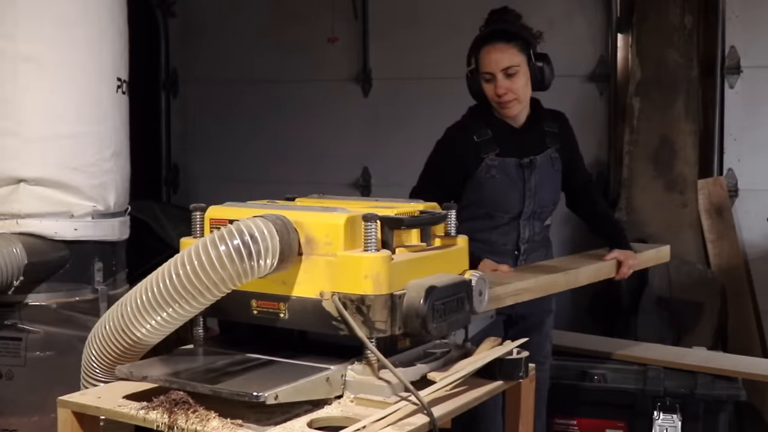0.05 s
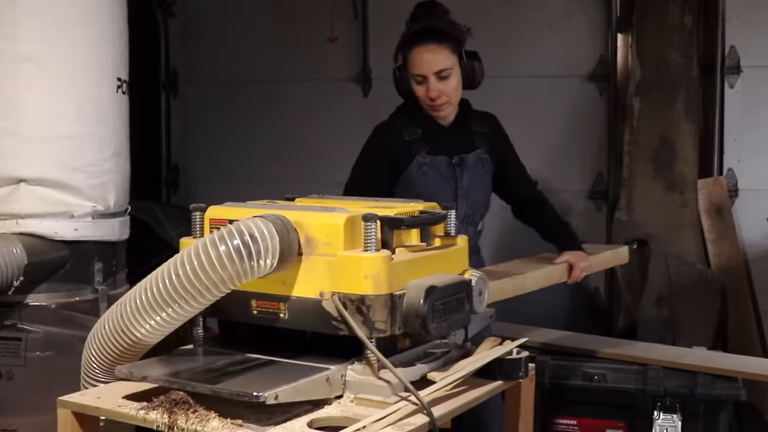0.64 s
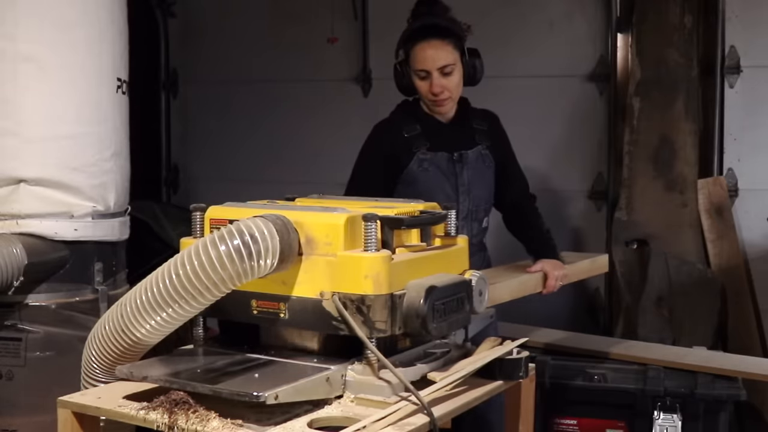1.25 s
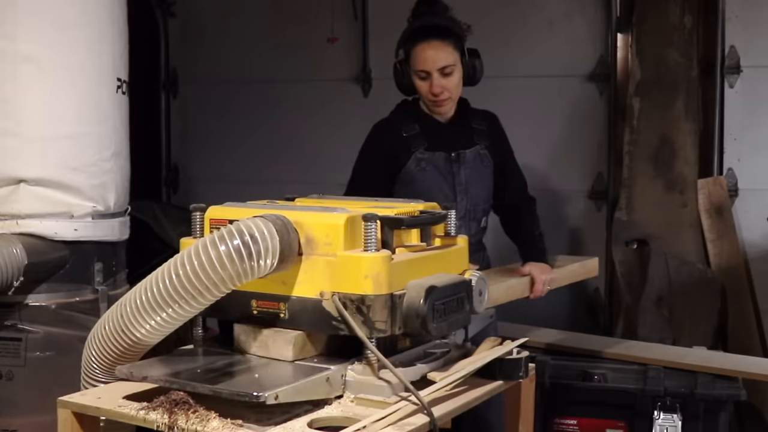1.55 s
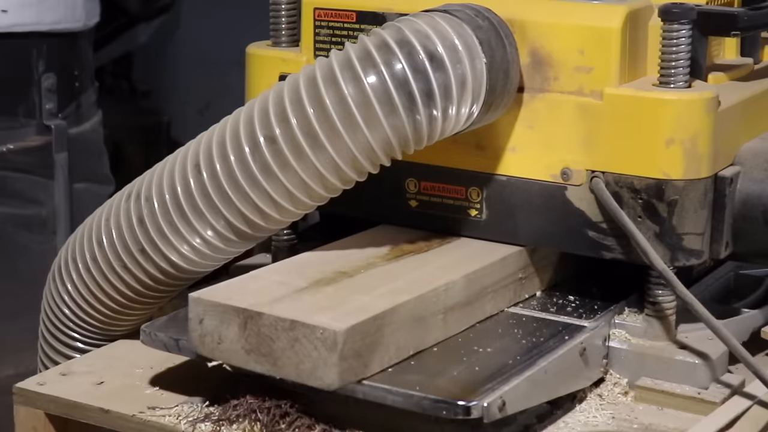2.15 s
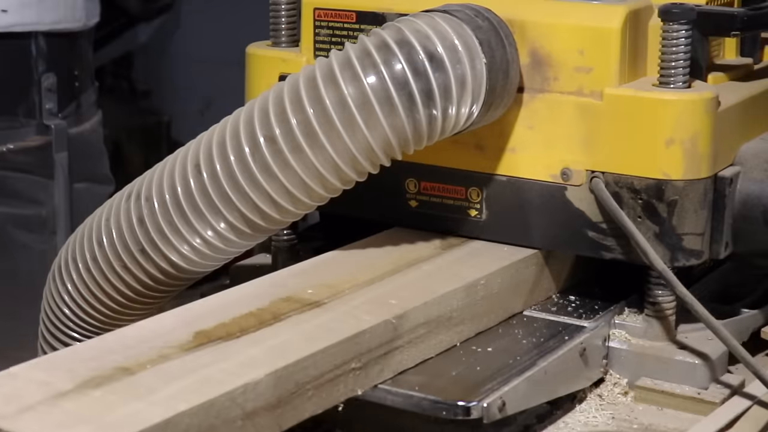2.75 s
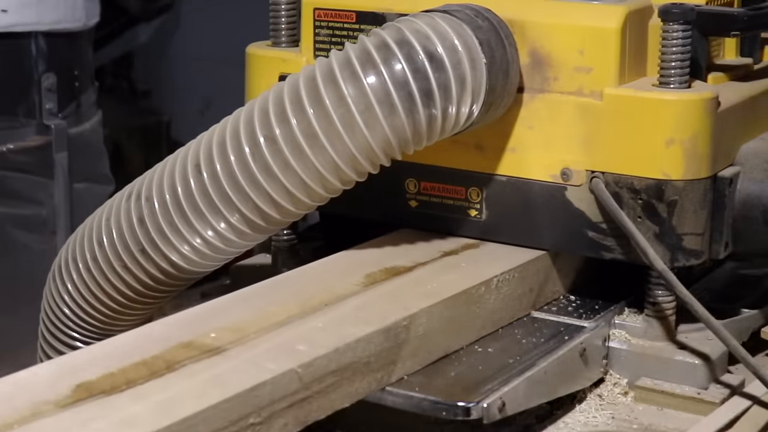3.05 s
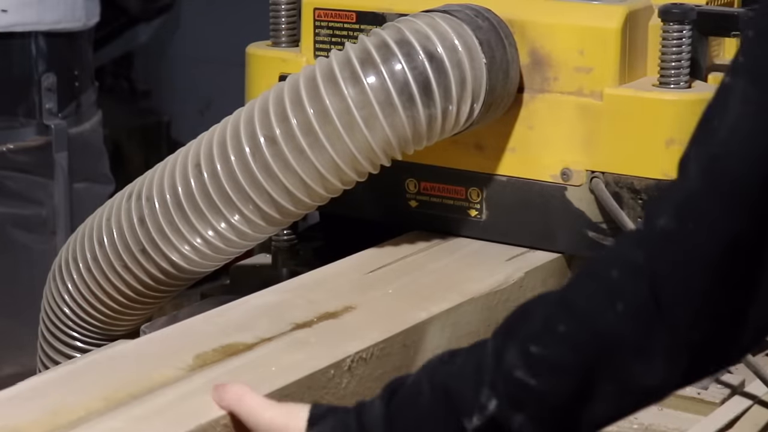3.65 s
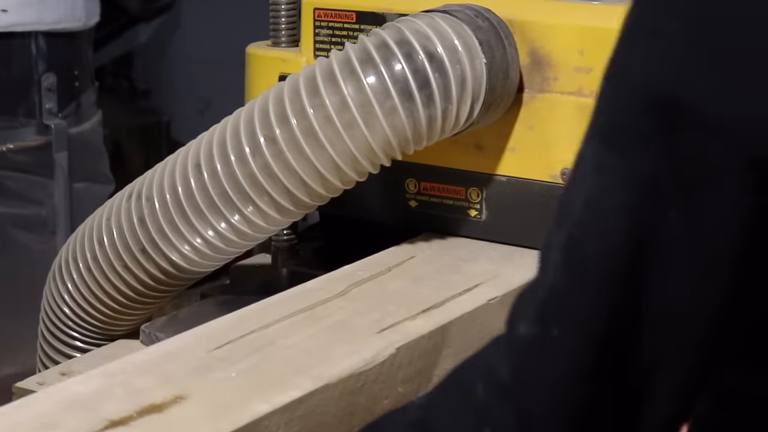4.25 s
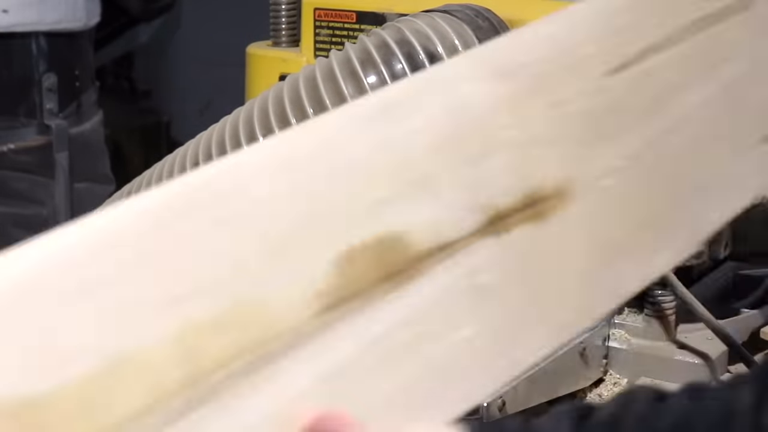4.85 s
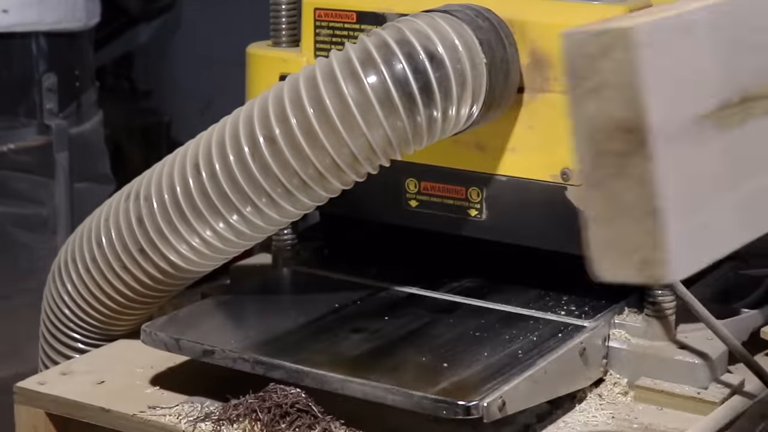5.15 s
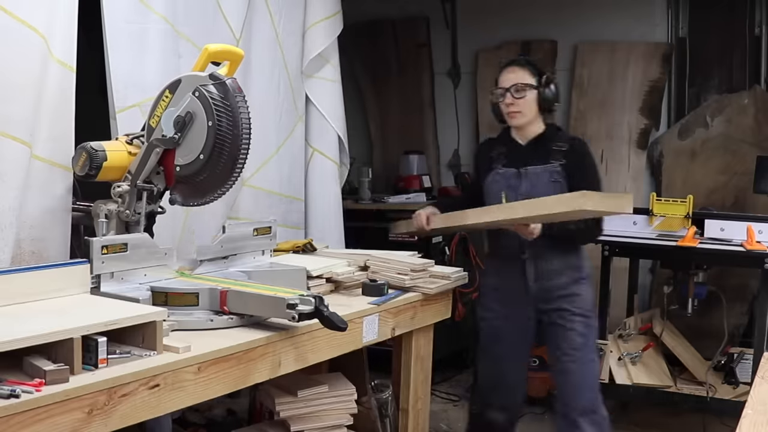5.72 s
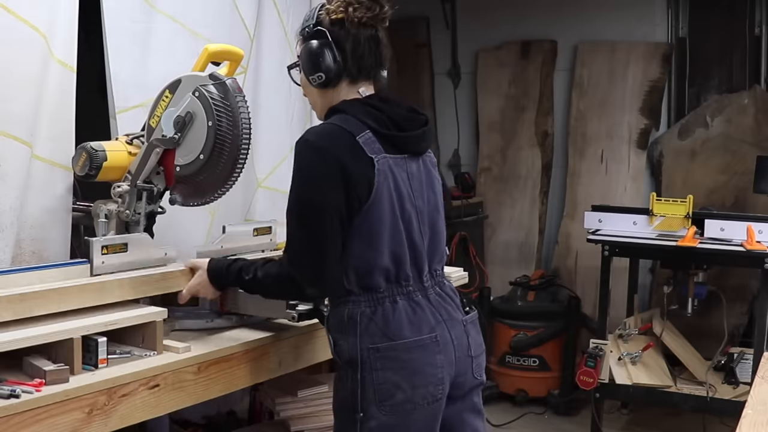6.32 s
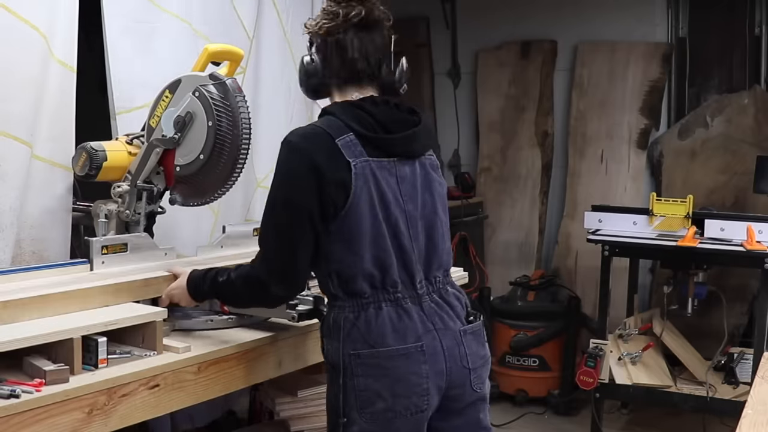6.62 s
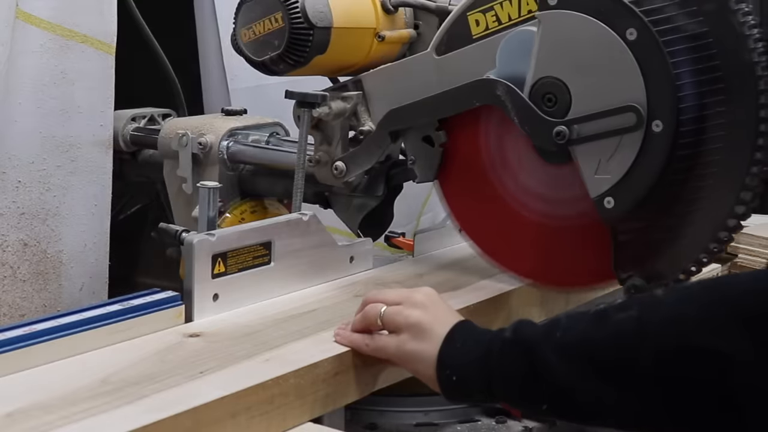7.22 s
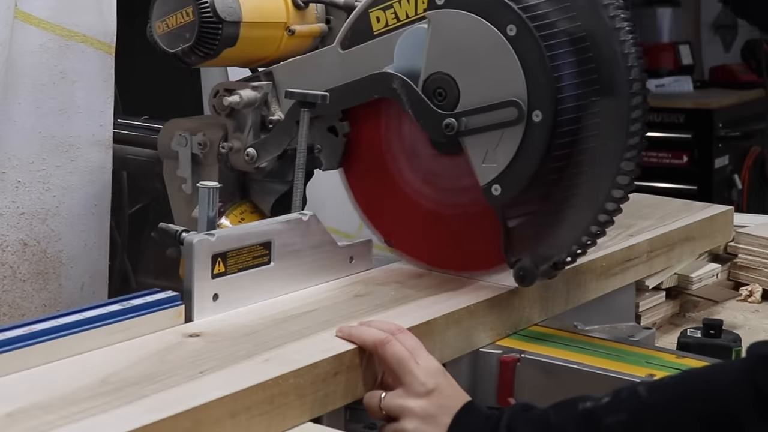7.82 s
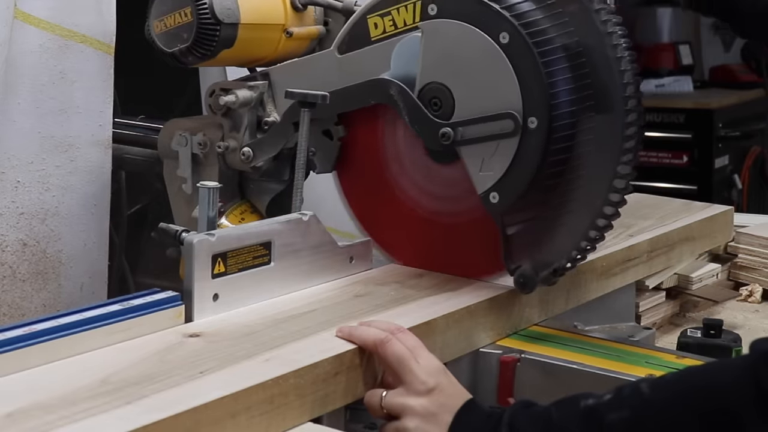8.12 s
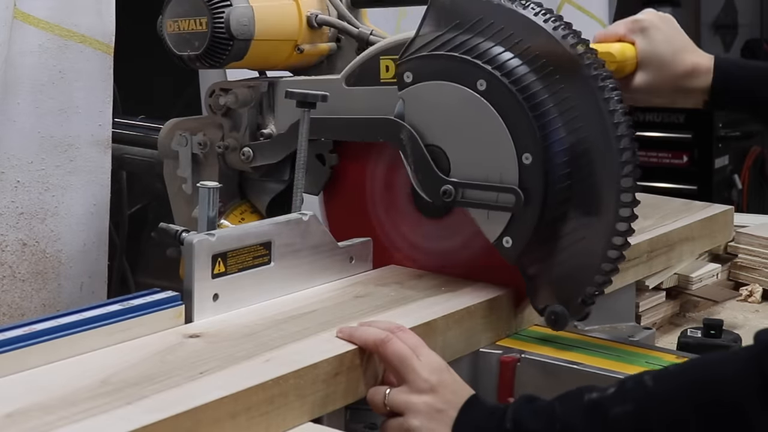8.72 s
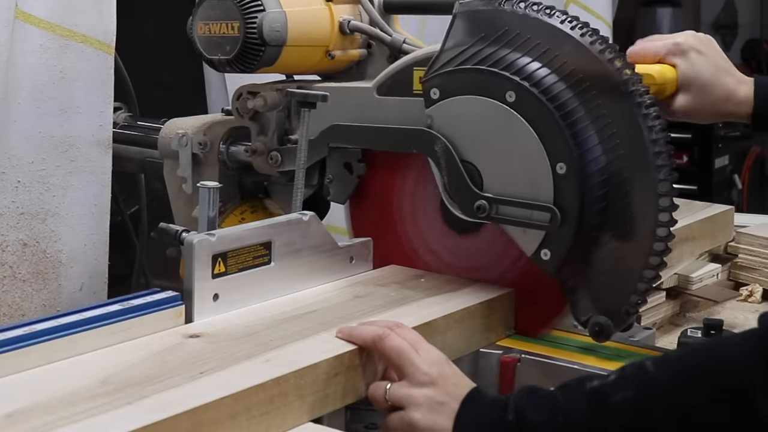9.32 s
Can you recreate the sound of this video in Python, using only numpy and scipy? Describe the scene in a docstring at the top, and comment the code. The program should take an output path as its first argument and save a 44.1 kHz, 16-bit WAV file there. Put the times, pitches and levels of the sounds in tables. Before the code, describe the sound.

In a workshop, a loud planer sags under a cut and recovers, followed by wooden knocks and a miter saw spinning up and slicing wood.

```python
"""Planer, board and miter saw

A thickness planer, first from afar and then close, sags under a board and recovers as it clears:
its three knives hammer the wood and chop the air into a siren tone, over gear tones and rushing air.
The board is set down on a bench with a few ringing knocks and a slide. Then a miter saw clicks on,
whines up to speed and cuts through it, its teeth squealing and its blade plate ringing."""
import sys
import numpy as np
from scipy import signal
from scipy.fft import rfft, irfft
from scipy.io import wavfile
from scipy.ndimage import uniform_filter1d

SR = 44100
rng = np.random.default_rng(int(sys.argv[2]) if len(sys.argv) > 2 else 0)


def store_pcm(level_fs):
    """Save levels as 16-bit WAV."""
    pcm = np.round(np.clip(level_fs, -1, 1) * 32767).astype(np.int16)
    wavfile.write(sys.argv[1], SR, np.atleast_2d(pcm).T)


N = 417627
TIME = np.arange(N) / SR
FREQ = np.fft.rfftfreq(N, 1 / SR)
TOP_HZ = 15900


def amp(db):
    """Decibels to gain."""
    return 10 ** (np.asarray(db) / 20)

def unit(x):
    """Scales to rms 1."""
    return x / np.sqrt(np.mean(x ** 2) + 1e-20)

def automation(points):
    """A breakpoint curve at every sample."""
    return np.interp(TIME, *np.transpose(points))

def read(points, hz):
    """Reads a spectrum table on a log-frequency axis."""
    f, value = np.transpose(points)
    return np.interp(np.log(hz + 1), np.log(f), value)

def swell(s, half_length):
    """A bell envelope, 1 at time s."""
    return np.exp(-((TIME - s) / half_length) ** 2)

def gate(start, end):
    """Open from start to end, with 3 ms fades."""
    return np.clip(np.minimum(TIME - start, end - TIME) / .003 + .5, 0, 1)

def add(mix, s, sound):
    """Mixes a sound in at time s."""
    part = mix[round(s * SR):][:len(sound)]
    part += sound[:len(part)]

def noise(gain):
    """Noise of rms 1, shaped by a gain at each frequency."""
    return unit(irfft(rfft(rng.standard_normal(N)) * gain, N))

def wander(hz):
    """Smooth random modulation of rms 1."""
    return noise(1 / (1 + (FREQ / hz) ** 4))

def drift(hz):
    """Ramps between random values, hz of them a second."""
    knots = np.arange(0, TIME[-1] + 1, 1 / hz)
    return np.interp(TIME, knots, np.clip(rng.standard_normal(1000), -2, 2)[:len(knots)])

def ring(hz, half_width):
    """A resonance fed by noise."""
    return noise(np.minimum(FREQ / hz, 1) ** 2 / (1 + ((FREQ - hz) / half_width) ** 2))

def tone(turns, flutter, flutter_hz):
    """A partial of rms 1 whose level and phase flutter in turbulent air."""
    phase = 2 * np.pi * (turns + rng.random())
    knots = np.arange(0, TIME[-1] + 1, 1 / 400)
    pole = np.exp(-2 * np.pi * flutter_hz / 400)
    smooth = signal.lfilter([1], [1, -pole], rng.standard_normal((2, len(knots))))
    a, b = (flutter * np.interp(TIME, knots, unit(v)) for v in smooth)
    return ((1 + a) * np.cos(phase) + b * np.sin(phase)) * np.sqrt(2 / (1 + 2 * flutter ** 2))

def standing_waves(hz, depth_db, spacing_hz):
    """Gain that swells and thins a partial as its pitch moves."""
    grid = np.arange(0, SR, spacing_hz)
    heights = np.clip(rng.standard_normal(2000), -1.6, 1.6)[:len(grid)]
    return amp(depth_db * np.interp(hz, grid, heights))

def turbulence(x, depth_db, bins, frames):
    """Lifts and thins random patches of a noise's spectrogram."""
    z = signal.stft(x, SR, nperseg=512)[2]
    field = uniform_filter1d(rng.standard_normal(z.shape), bins, axis=0)
    field = uniform_filter1d(field, frames, axis=1)
    return signal.istft(z * amp(depth_db * unit(field)), SR, nperseg=512)[1][:N]

def rush(free, cut, load, roar_db, hiss_db):
    """Air noise as low roar and high hiss; load crossfades from the free EQ to the cutting EQ."""
    low = 1 / np.sqrt(1 + (FREQ / 3800) ** 16)
    out = np.zeros(N)
    for eq, share in ((free, 1 - load), (cut, load)):
        gain = amp(read(eq, FREQ)) * (FREQ / np.hypot(FREQ, 60)) ** 2
        roar = amp(roar_db) * noise(gain * low)
        hiss = amp(hiss_db) * noise(gain * np.sqrt(1 - low ** 2))
        out += np.sqrt(share) * (roar + hiss)
    return out


# Room tone EQ: f/Hz, level/dB
SHOP_EQ = [(18, -61), (30, -38), (220, -3.5), (435, -7.5), (496, -4.5), (645, -5), (1090, -2.5),
           (1420, -6.5), (1530, -10), (1790, -0.5), (1940, -8), (15800, -36)]

def room_tone():
    """The quiet noise bed of the shop."""
    return amp(-60.5) * noise(amp(read(SHOP_EQ, FREQ)))

def hum(hz, db):
    """A hum of steady pitch."""
    return amp(db) * tone(hz * TIME, 0.44, 1.9)

# Reverb decay: f/Hz, t60/s
SHOP_DECAY = [(100, 0.19), (500, 0.18), (2000, 0.18), (6000, 0.13), (15000, 0.16)]

def reverb(x):
    """Dense reflections of the shop, the treble dying first."""
    t = np.arange(SR // 2) / SR
    taps = rng.standard_normal(len(t)) * (rng.random(len(t)) < .08) * (t > .003)
    hz, when, z = signal.stft(taps, SR, nperseg=256)
    tail = signal.istft(z * amp(-60 * when / read(SHOP_DECAY, hz)[:, None]), SR, nperseg=256)[1]
    return signal.oaconvolve(x, tail / np.linalg.norm(tail))[:N]


# Sharp ticks: t/s, level/dB
TICKS = [(6.698, -54), (6.737, -53), (6.851, -42), (6.896, -39.5)]

def ticks():
    """Tiny bursts of bright noise."""
    out, t = np.zeros(N), np.arange(SR // 3) / SR
    bright = noise(FREQ / np.hypot(FREQ, 9000))
    for s, db in TICKS:
        add(out, s, amp(db) * bright[round(s * SR):][:len(t)] * np.exp(-t / 0.0013))
    return out

# Friction EQ: f/Hz, level/dB
RASP_EQ = [(100, -28), (500, -22.5), (1200, 1), (2400, 2.5), (4000, -4), (6000, -8), (8500, -10),
           (15500, -20.5)]
# Slide cues: t/s, length/s, level/dB
SLIDES = [(5.525, 0.67, -74.5), (5.63, 0.047, -52.5), (5.914, 0.021, -56.5), (6.199, .08, -53),
          (6.278, .022, -43.5), (6.404, 0.061, -33)]

def slides():
    """The board rasps across the bench."""
    rasp = noise(amp(read(RASP_EQ, FREQ))) * amp(1.5 * wander(250))
    envelope = [0, .35, .75, 1], [0.00039, 0.67, 0.73, 0.00038]
    return rasp * sum(amp(db) * np.interp((TIME - s) / length, *envelope) for s, length, db in SLIDES)

# Modes of the board on the bench: f/Hz, level/dB, t60/s
BOARD_MODES = [(438, -4.5, 0.077), (510, -0.5, 0.079), (553, 1.5, 0.069), (722, 2, 0.072), (983, 1, 0.07),
               (1144, -2, .08), (1373, 2.5, 0.048), (1498, -1.5, 0.1), (1830, -10.5, 0.19),
               (2026, -2, 0.051), (2400, -3, .06), (2480, -16.5, 0.22), (2650, -12, .07), (3500, -18, .06),
               (3950, -28.5, 0.081)]
# EQ of a knock's crack: f/Hz, level/dB
CRACK_EQ = [(60, -22), (200, -14.5), (450, -10.5), (2200, 9), (3500, 0), (6000, -8.5), (10000, -16.5),
            (15500, -28)]
# The board knocks; in the last row the saw's switch clicks on:
# t/s, blow level/dB, blow f/Hz, relative ring level/dB, crack level/dB
KNOCKS = [(4.798, -42, 3500, -74, -45), (5.738, -52, 1190, -50, -60.5), (6.021, -42, 1090, -41, -50),
          (6.029, -35, 2600, -47.5, -29), (6.033, -28.5, 1090, -55.5, -28),
          (6.0454, -21.5, 2650, -37, -26.5), (6.1308, -19.5, 1300, -19.5, -26),
          (6.190, -22, 1213, -21.5, -30), (6.2968, -4.5, 1900, -7.5, -15), (6.3257, -18, 3830, -17, -29.5),
          (6.329, -20, 1340, -49, -33), (6.339, -27, 1590, -31.5, -49), (6.455, -30, 1160, -25.5, -35),
          (6.5755, -30, 1280, -30, -37.5), (6.611, -35, 600, -30, -48), (6.734, -43, 1616, -47, -56),
          (6.963, -40, 2230, -65, -50.5)]
CONTACT_CYCLES = 1.6  # a blow peaks after this many cycles of its pitch: the higher, the shorter

def knocks():
    """Board knocks and the switch click: each a short blow, a crack and a ring."""
    out, t = np.zeros(N), np.arange(SR // 3) / SR
    grit = noise(amp(read(CRACK_EQ, FREQ)))
    for s, blow_db, hz, ring_db, crack_db in KNOCKS:
        contact = CONTACT_CYCLES / hz
        blow = t / contact * np.exp(1 - t / contact) * np.sin(2 * np.pi * hz * t)
        # each place of contact weights and detunes the modes differently
        modes = sum(amp(db + rng.standard_normal() - 60 * t / t60)
                    * np.sin(2 * np.pi * (f * rng.uniform(0.95, 1.02) * t + rng.random()))
                    for f, db, t60 in BOARD_MODES)
        body = modes * (1 - np.exp(-t / 0.00091))
        crack = grit[round(s * SR):][:len(t)] * (np.exp(-t / 0.0039) + 0.18 * np.exp(-t / 0.018))
        add(out, s, amp(blow_db) * blow + amp(ring_db - 11) * body + amp(crack_db) * crack)
    return out

def handling():
    """The board is set down, then the saw's switch clicks on."""
    low_cut = signal.butter(2, 170, "high", fs=SR, output="sos")  # a narrow board radiates little bass
    direct = signal.sosfilt(low_cut, knocks() + slides() + ticks())
    return direct + amp(-13) * reverb(direct)


def glide(stages):
    """From rest, a pitch eases towards each stage's target in turn."""
    hz = np.ones(N)
    for s, target_hz, lag in stages:
        at = round(s * SR)
        hz[at:] = target_hz + (hz[at] - target_hz) * np.exp(-TIME[:N - at] / lag)
    return hz

# Motor partials: pitch ratio, relative level/dB
WHINE_PARTIALS = [(.177, -90.5), (.307, -85), (1, -64), (2, -64.5), (3.39, -61.5), (7.08, -58.5),
                  (7.59, -53.5), (13.6, -64), (14.7, -49)]
FULL_SPEED_HZ = 1300

def whine(hz):
    """The saw motor: thin, rough partials that glide together and grow with its speed."""
    level_db = 1 + 22.5 * np.log10(hz / FULL_SPEED_HZ)
    turns = np.cumsum(hz * (1 + 0.0032 * wander(72))) / SR
    return amp(level_db) * sum(amp(db) * standing_waves(k * hz, 2.6, 309) * tone(k * turns, 0.56, 15)
                               for k, db in WHINE_PARTIALS)

# Blade air EQ, running free and cutting: f/Hz, level/dB
SAW_FREE_EQ = [(47, -84), (80, -54), (212, -41), (491, -24.5), (536, -20), (640, -21), (1040, -16),
               (1390, -16), (1580, -12.5), (2470, -4.5), (4190, -8.5), (4680, -6.5), (7960, 3), (9090, 1.5),
               (15800, 3.5)]
SAW_CUT_EQ = [(47, -84), (80, -41), (491, -28.5), (536, -1), (654, -30), (1190, -8.5), (1270, -24),
              (1730, -13.5), (3080, 1.5), (3920, -14.5), (5000, -15), (5350, -3), (12100, -5), (13500, -32),
              (15800, -28)]

def blade_air(motor_hz, depth):
    """The blade stirs the air, louder with speed and depth of cut."""
    decades = np.log10(motor_hz / FULL_SPEED_HZ)
    roar_db = -50.5 + 22.2 * decades + 10 * depth
    hiss_db = -43 + 25 * decades + 6.5 * depth
    air = rush(SAW_FREE_EQ, SAW_CUT_EQ, depth, roar_db, hiss_db)
    return turbulence(air, depth_db=2.5, bins=3, frames=45) * amp((0.36 + 0.65 * depth) * wander(50))

# Tooth squeals: ratio to the singing tone, start t/s, peak t/s, end t/s, level/dB
SQUEALS = [(3.8, 8.12, 8.33, 8.59, -41), (3.56, 8.2, 8.36, 8.84, -51), (6.3, 8.22, 8.34, 8.5, -40.5),
           (3.37, 8, 8.56, 8.7, -50.5), (2.67, 8.4, 8.53, 8.72, -47), (2.3, 8.38, 8.52, 8.68, -48.5)]
# Blade plate resonances: f/Hz, half width/Hz, level/dB
PLATE_MODES = [(3060, 490, -55), (4183, 11, -49), (8300, 260, -51), (13540, 190, -46), (15200, 160, -51)]

def squeal(turns, depth):
    """The teeth squeal, one pitch taking over from another, and set the plate ringing."""
    teeth = sum(amp(db) * np.interp(TIME, times, [0, 1, 0]) * tone(k * turns, 0.16, 11)
                for k, *times, db in SQUEALS)
    plate = sum(amp(db) * ring(hz, width) for hz, width, db in PLATE_MODES)
    break_db = -13 * swell(8.42, 0.021)  # between two pushes
    return (teeth + depth * plate) * amp(break_db + 1.8 * wander(28))

# The motor spins up, meets the wood, labours, comes free, brakes: t/s, target f/Hz, lag/s
MOTOR_GLIDE = [(6.93, 1275, .155), (7.6, 1220, 0.16), (7.94, 534, 0.4), (8.638, 1320, .155),
               (9.36, 13, 0.12)]
# The singing tone settles, sags in the cut, recovers, lifts: t/s, target f/Hz, lag/s
SINGING_GLIDE = [(6.96, 1400, 0.091), (7.94, 1270, 0.32), (8.72, 1436, 0.17), (9.35, 1650, 0.19)]
# Teeth in the wood: t/s, depth/0-1
CUT_DEPTH = [(8.05, 0.05), (8.15, 0.2), (8.24, 0.3), (8.33, 0.84), (8.42, 0.7), (8.5, 0.95), (8.6, 0.97),
             (8.66, 0.56), (8.7, 0.06)]

def miter_saw():
    """One cut: blade air, a second whine as of a dust extractor fan on the same supply, squeal and hum around
    the motor's whine."""
    motor_hz, depth = glide(MOTOR_GLIDE), automation(CUT_DEPTH)
    turns = np.cumsum(glide(SINGING_GLIDE)) / SR
    air = blade_air(motor_hz, depth)
    fade_in = np.clip((TIME - 7.05) / 0.17, 0, 1)
    singing = amp(-59 + 4.5 * depth) * tone(turns, 0.29, 8.1) * fade_in
    return air + singing + squeal(turns, depth) + hum(hz=542, db=-73.5) + whine(motor_hz)


ENTRY_S, EXIT_S, GRIP_S = 0.802, 4.312, .035  # the board meets and leaves the knives; ramp time
SWAY_DB, SWAY_HZ = 4, 9.7  # gear tones and the siren's octave swell and drop out

def gripped(start, end):
    """1 while the knives hold the wood, 0 before and after."""
    return np.clip(np.minimum(TIME - start, end + GRIP_S - TIME) / GRIP_S, 0, 1)

def rotation(hz, load):
    """Turns of the cutterhead, which runs less evenly in the wood."""
    jitter = (.0003 + 0.00055 * load) * wander(25)
    return np.cumsum(uniform_filter1d(hz, size=1300) * (1 + jitter)) / SR

def housing_db(housing, hz):
    """Resonances of the housing boost a partial as it glides through."""
    return sum(db * np.exp(-np.minimum(abs(hz - f) / width, 10) ** 2) for f, width, db in housing)

# Bigger chips: t/s, half length/s, f/Hz, half width/Hz, level/dB
TEAR_OUTS = [(0.84, 0.059, 4930, 250, -47), (2.319, 0.013, 3240, 100, -49), (3.25, .018, 10900, 890, -56),
             (4.184, .005, 4010, 2500, -44), (4.202, 0.004, 4090, 2500, -47),
             (4.257, 0.0057, 5530, 2500, -39.5), (4.264, 0.011, 2000, 150, -43.5)]

def tear_outs():
    """Brief bursts of rasp where the knives tear the grain."""
    return sum(amp(db) * swell(s, length) * ring(hz, width) for s, length, hz, width, db in TEAR_OUTS)

# Drive partials: ratio to cutterhead speed, far level/dB, near level/dB, change under load/dB
GEAR_PARTIALS = [(1.955, -61, -57, -11.5), (3.91, -77, -68.5, -2), (5, -65, -67.5, 4), (9, -80, -64.5, -13),
                 (10.86, -69, -63, -34), (12, -85, -73, -10), (12.27, -64, -77, 0), (13.81, -116, -77.5, 7),
                 (15.79, -63, -74.5, 5.5), (18.72, -72.5, -71, 9.5)]

def gears(turns, load, near, trim_db=0):
    """Motor and gear tones, locked to the cutterhead; load shifts their balance."""
    out = np.zeros(N)
    for ratio, far_db, near_db, load_db in GEAR_PARTIALS:
        db = (near_db if near else far_db) + trim_db + load_db * load
        out += amp(db + SWAY_DB * drift(SWAY_HZ)) * tone(ratio * turns, 0.29, 3.8)
    return out

# Dips and swells as board and worker move: t/s, half length/s, siren gain/dB, hiss gain/dB
MOVES = [(0.584, 0.17, -10.5, 2), (1.054, 0.058, -11, -12), (1.854, 0.15, -7, 1), (2.33, 0.083, 4, 2),
         (4.2, 0.18, -3.5, -2.5), (4.397, 0.047, -8, 6), (4.726, 0.086, -6.5, 3), (5.09, 0.096, -14.5, -4),
         (5.373, 0.13, -18.5, 1.5)]

def siren(turns, hz, load, housing, hum_db, siren_db, octave_db, octave_load_db, flutter):
    """The once-a-turn hum, the three-knife tone and its octave, coloured by the housing."""
    siren_db += sum(db * swell(s, length) for s, length, db, _ in MOVES)
    octave_db += octave_load_db * load + .5 * SWAY_DB * drift(SWAY_HZ)
    return sum(amp(db + housing_db(housing, k * hz)) * tone(k * turns, flutter, 13)
               for k, db in ((1, hum_db), (3, siren_db), (6, octave_db)))

# Snipe, a deeper cut while only one roller holds the board:
# start t/s, end t/s, roar gain/dB, hiss gain/dB, bite gain/dB
SNIPES = [(0.77, 1.038, 3, 4, 7.5), (4.16, 4.295, 5.5, 6, 1)]

def effort(speed, load, roar_free_db, roar_cut_db, hiss_free_db, hiss_cut_db, bite_db):
    """Levels of roar, hiss and knife bite: free air follows the speed, cutting follows the sag."""
    air_db, sag = 31 * np.log10(speed), 1 - speed
    roar_db = (1 - load) * (roar_free_db + air_db) + load * (roar_cut_db + 27.5 * sag)
    hiss_db = (1 - load) * (hiss_free_db + air_db) + load * (hiss_cut_db + 17.5 * sag)
    hiss_db += sum(db * swell(s, length) for s, length, _, db in MOVES)
    bite_db -= 4.5 * swell(2.68, 0.42)  # less bite where the board is thin
    snipe_db = sum(np.outer(gains, gripped(start, end)) for start, end, *gains in SNIPES)
    return np.array([roar_db, hiss_db, bite_db]) + snipe_db

def chips(air, turns, load, chop):
    """Chips torn off at each blow make the turbulent air pulse."""
    strokes = np.cos(2 * np.pi * 3 * turns) + np.cos(2 * np.pi * turns)
    pulse = (1 + chop * load * strokes) * amp(0.99 * load * wander(60))
    return pulse * turbulence(air, depth_db=1.94, bins=4, frames=22)

def knife_blows(turns, hz, load, eq, housing, flutter, third_db):
    """Three unequal knives strike the wood: harmonics of the turn rate, every third one boosted."""
    comb, grid = np.zeros(N), np.arange(0, SR / 2, 10)
    colour_db = read(eq, grid) + housing_db(housing, grid)
    for k in range(2, 42):
        if k not in (3, 6):  # the siren plays these
            db = np.interp(k * hz, grid, colour_db) + third_db * (k % 3 == 0)
            grain_db = 2 * drift(hz=9)
            gain = amp(db + grain_db) * (k * hz < TOP_HZ) * standing_waves(k * hz, 2.9, 109.8)
            comb += gain * tone(k * turns, flutter, 9.1)
    return load * amp(1.67 * wander(5.4)) * unit(comb)  # the grain varies the bite

# Distant EQs of free air, cutting air and knife bite: f/Hz, level/dB
FAR_FREE_EQ = [(60, -28), (200, -30), (350, -25), (600, -11), (1000, -9.5), (1600, -2.5), (2200, 0),
               (3000, -8), (4200, -10.5), (5500, -8), (7500, -10.5), (10000, -12.5), (13000, -13.5),
               (15700, -14.5)]
FAR_CUT_EQ = [(60, -38), (200, -64), (350, -21), (600, -6.5), (1000, -2.5), (1600, 6.5), (2200, 6),
              (3000, 0.5), (4200, -3.5), (5500, -1.5), (7500, -5), (10000, -4), (13000, -6.5), (15700, -15)]
FAR_BITE_EQ = [(700, -14), (1500, 4.5), (2000, 3.5), (2900, -7), (3700, 3), (4700, 6), (5600, -0.5),
               (7000, -4), (9000, -8), (12000, -17), (15500, -8)]
# Housing resonances from afar: f/Hz, half width/Hz, gain/dB
FAR_HOUSING = [(416, 6.1, 11), (4640, 90, 5.5)]
# Cutterhead speed from afar: t/s, f/Hz
FAR_SPEED = [(0.0, 371), (0.018, 388), (0.252, 405.5), (0.574, 412.5), (0.802, 414), (0.942, 380.2),
             (1.04, 368.2), (1.248, 381), (1.78, 389)]

def far_planer(load, free_hz=414):
    """From across the shop: the planer runs free, then takes the board."""
    hz = automation(FAR_SPEED)
    turns = rotation(hz, load)
    roar_db, hiss_db, bite_db = effort(hz / free_hz, load, roar_free_db=-53.5, roar_cut_db=-55,
                                       hiss_free_db=-56.5, hiss_cut_db=-52.5, bite_db=-46.5)
    blows = knife_blows(turns, hz, load, FAR_BITE_EQ, FAR_HOUSING, flutter=0.28, third_db=5)
    drive = gears(turns, load, near=False)
    air = chips(rush(FAR_FREE_EQ, FAR_CUT_EQ, load, roar_db, hiss_db), turns, load, chop=0.055)
    howl = siren(turns, hz, load, FAR_HOUSING, hum_db=-71.5, siren_db=-44.5,
                 octave_db=-61.5, octave_load_db=6, flutter=0.19)
    return amp(bite_db) * blows + drive + air + howl

# Close-up EQs of free air, cutting air and knife bite: f/Hz, level/dB
NEAR_FREE_EQ = [(60, -50), (200, -33), (350, -23.5), (600, -26), (1000, -10.5), (1600, -3), (2200, 1),
                (3000, -1), (4200, -2.5), (5500, -5), (7500, -6.5), (10000, -9.5), (13000, -11.5),
                (15700, -16)]
NEAR_CUT_EQ = [(60, -31), (200, -49), (350, -29), (600, -19.5), (1000, -9.5), (1600, -3), (2200, 2.5),
               (3000, 4.5), (4200, 3), (5500, 4.5), (7500, 0), (10000, 2.5), (13000, 1.5), (15700, 6.5)]
NEAR_BITE_EQ = [(1000, -21), (2100, 10.5), (2700, 5.5), (3200, 1), (4000, -1.5), (4800, -0.5), (6200, 3),
                (7500, 1), (9600, 3.5), (11500, 0), (13000, -2), (15500, -10)]
# Housing resonances close up: f/Hz, half width/Hz, gain/dB
NEAR_HOUSING = [(782.5, 64, 22.6), (1836, 106, 8.2), (2366, 70, 3.34), (3086, 151, 17.45), (3995, 39, 4),
                (6360, 52, 7.7)]
# Cutterhead speed while the board drags on it: t/s, f/Hz
NEAR_SPEED = [(1.8, 640.6), (1.93, 655.8), (2.4, 660.6), (2.5, 637.2), (2.59, 647.7), (2.85, 605),
              (3.26, 550.6), (3.55, 524.6), (3.72, 531.8), (3.9, 529.4), (4.11, 508.4), (4.31, 521)]

def near_planer(load, free_hz=795.8, recovery_s=.105):
    """At the outfeed: the motor labours, then races back to its free speed."""
    recovered = 1 - np.exp(-np.maximum(TIME - EXIT_S, 0) / recovery_s)
    hz = (1 - recovered) * automation(NEAR_SPEED) + recovered * free_hz
    turns = rotation(hz, load)
    roar_db, hiss_db, bite_db = effort(hz / free_hz, load, roar_free_db=-56.5, roar_cut_db=-63.5,
                                       hiss_free_db=-58.5, hiss_cut_db=-57.5, bite_db=-44.5)
    blows = knife_blows(turns, hz, load, NEAR_BITE_EQ, NEAR_HOUSING, flutter=0.36, third_db=7.5)
    slack_db = -28 * (1 - recovered) * (1 - load)  # the gears duck as the load lets go
    drive = gears(turns, load, near=True, trim_db=slack_db)
    air = chips(rush(NEAR_FREE_EQ, NEAR_CUT_EQ, load, roar_db, hiss_db), turns, load, chop=0.09)
    howl = siren(turns, hz, load, NEAR_HOUSING, hum_db=-76, siren_db=-43,
                 octave_db=-62, octave_load_db=8.5, flutter=0.073)
    return amp(bite_db) * blows + drive + air + howl + hum(hz=648, db=-79.5)


def scene():
    """Far planer, near planer, bench and saw in turn, the same in both ears."""
    near_s, bench_s, bench_end_s, saw_s = 1.783, 5.52, 6.922, 6.963
    load = gripped(ENTRY_S, EXIT_S)
    mix = room_tone() * gate(bench_s, bench_end_s)
    mix += far_planer(load) * gate(-1, near_s)
    mix += near_planer(load) * gate(near_s, bench_s) + tear_outs()
    mix += handling()
    mix += miter_saw() * gate(saw_s, 20)
    return np.array([mix, mix])

def record(dry):
    """A soft clip rounds the hardest knock near full scale; a steep low-pass trims the top."""
    clipped = dry / (1 + (dry / .92) ** 8) ** (1 / 8)
    low_pass = signal.firwin(511, TOP_HZ, window=("kaiser", 9), fs=SR)
    return signal.oaconvolve(clipped, low_pass[None], "same")


dry = scene()
out = record(dry)
store_pcm(out)
```